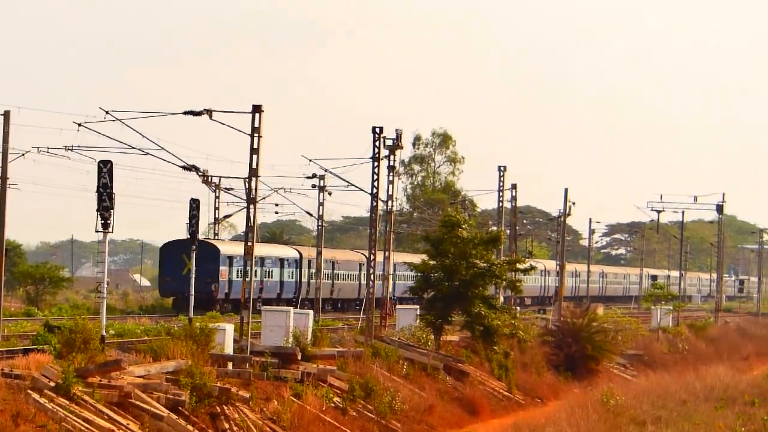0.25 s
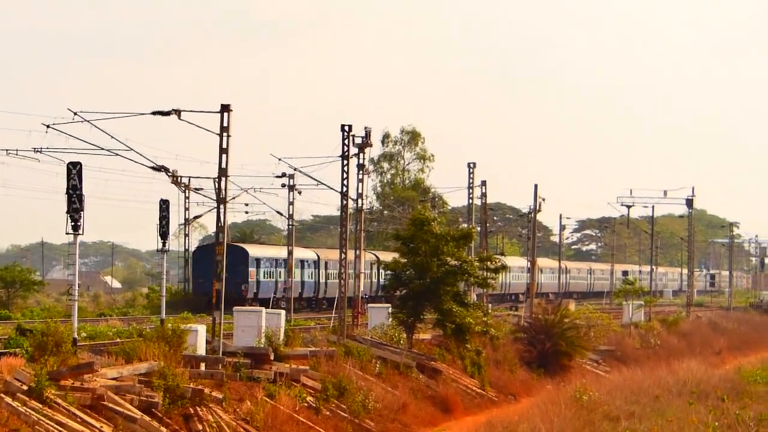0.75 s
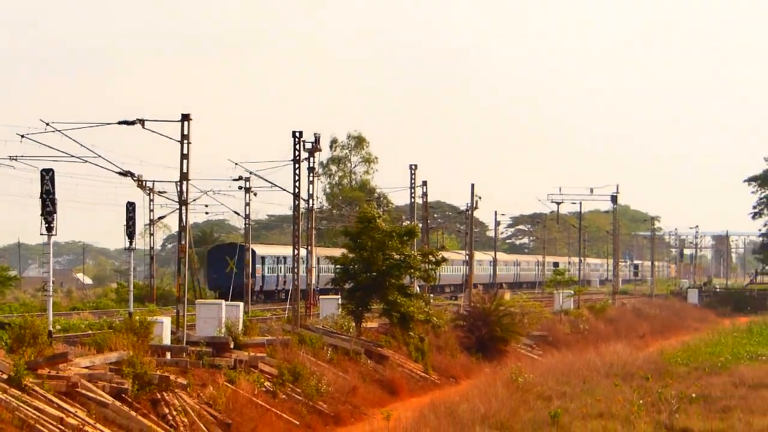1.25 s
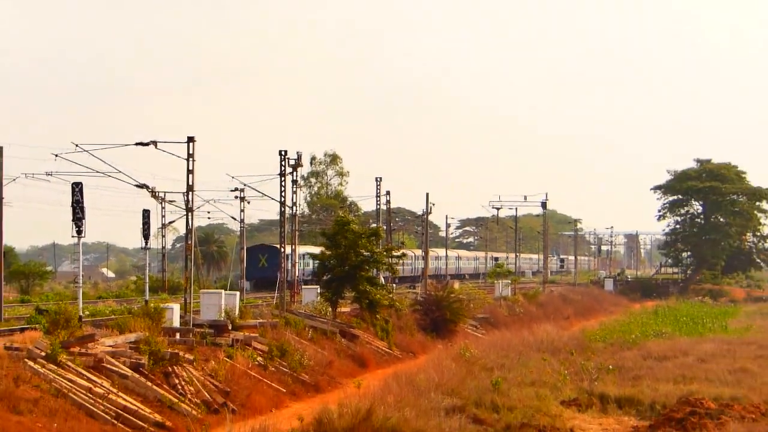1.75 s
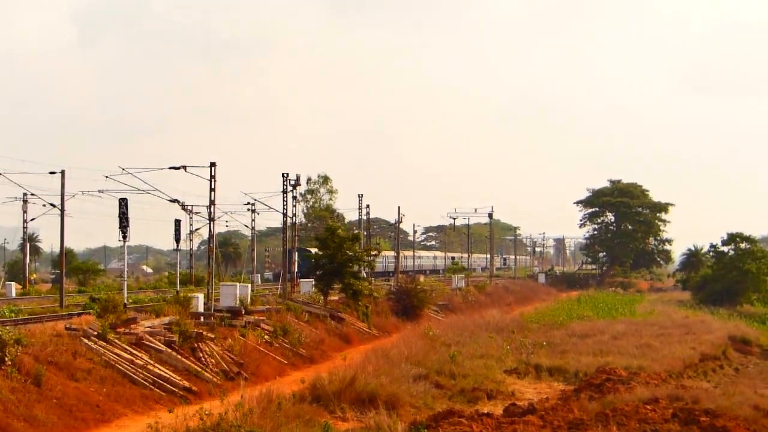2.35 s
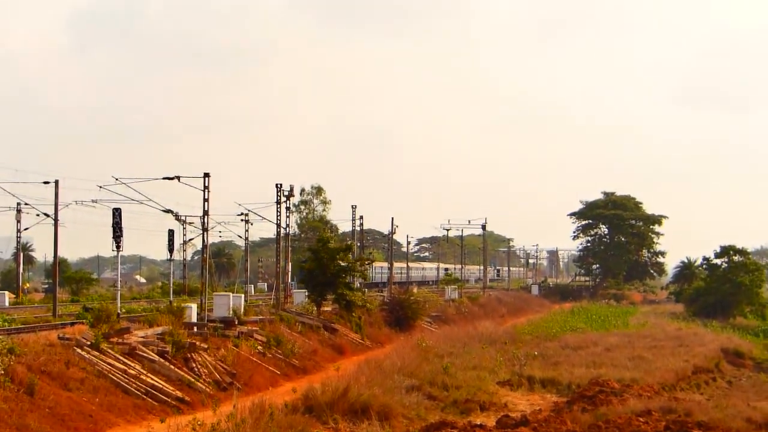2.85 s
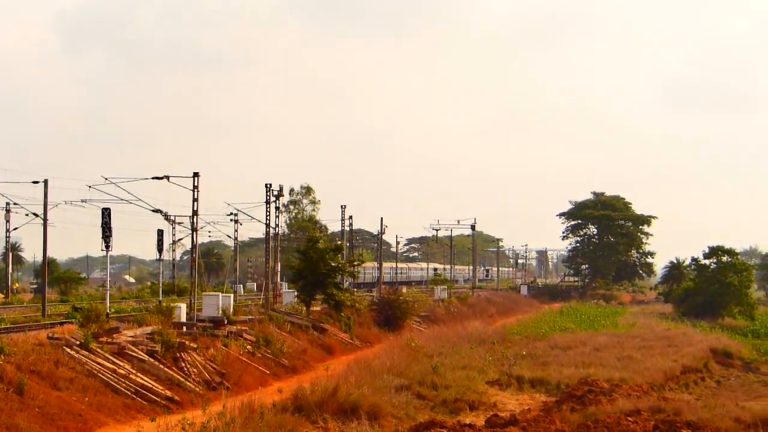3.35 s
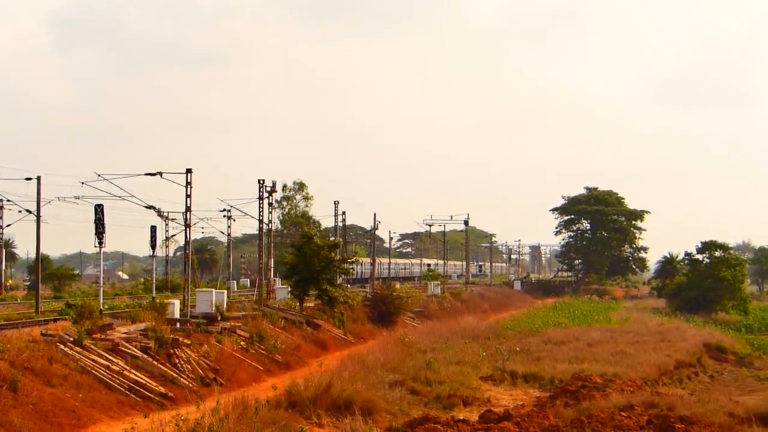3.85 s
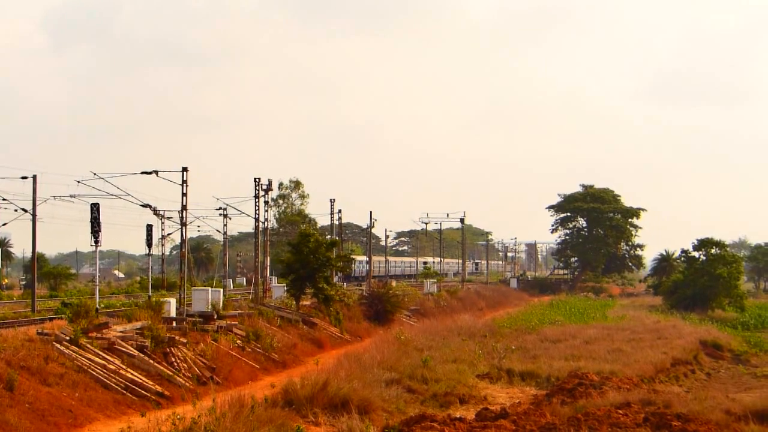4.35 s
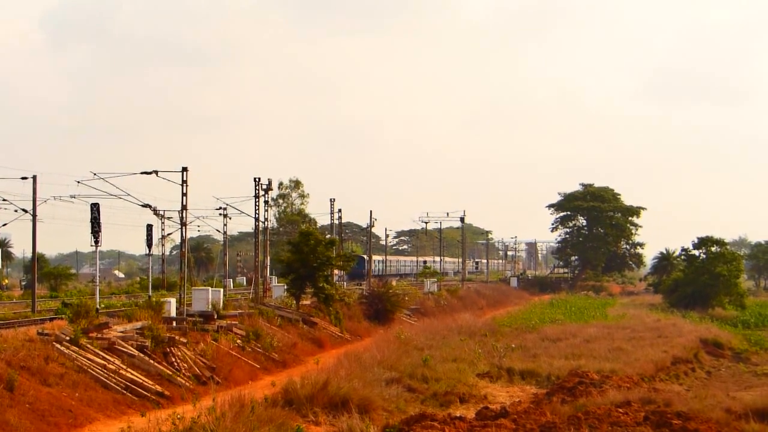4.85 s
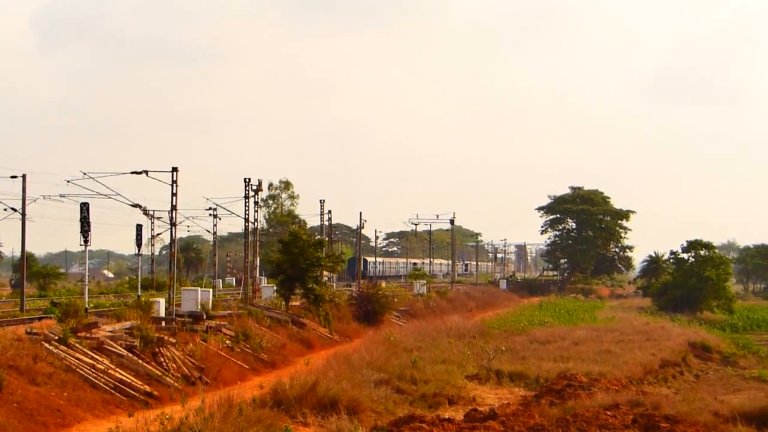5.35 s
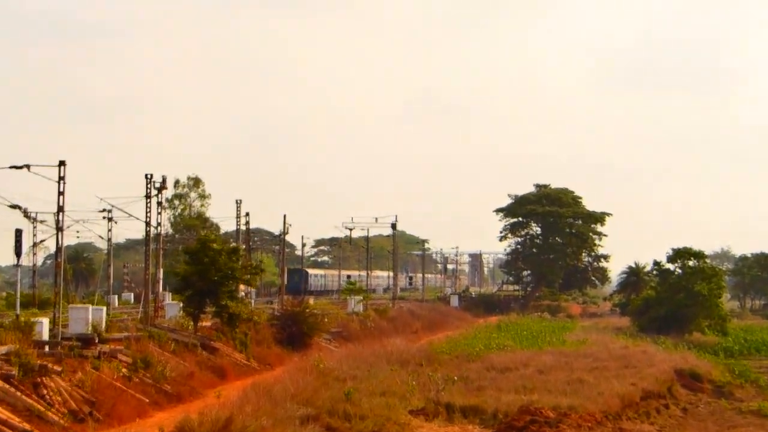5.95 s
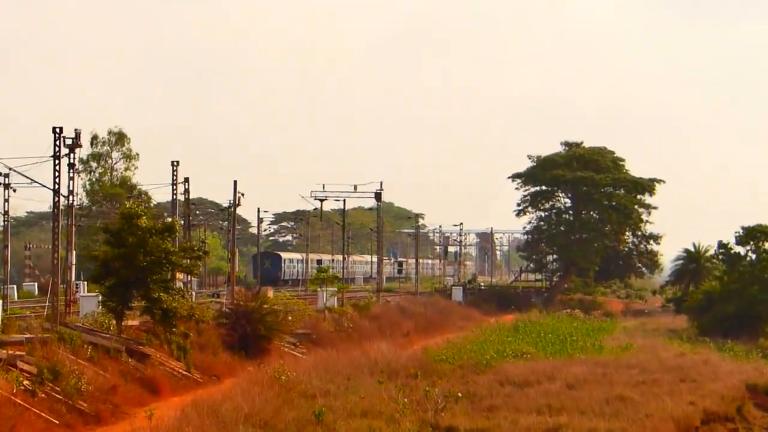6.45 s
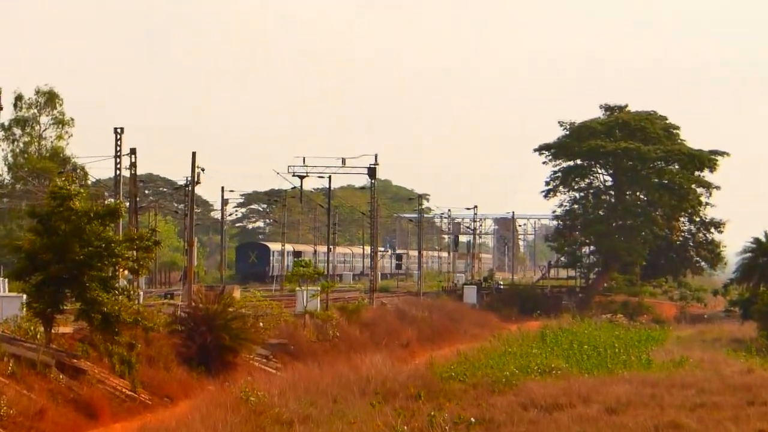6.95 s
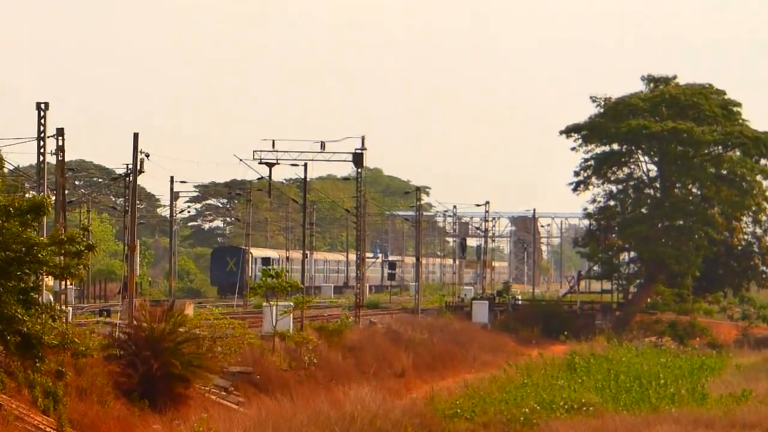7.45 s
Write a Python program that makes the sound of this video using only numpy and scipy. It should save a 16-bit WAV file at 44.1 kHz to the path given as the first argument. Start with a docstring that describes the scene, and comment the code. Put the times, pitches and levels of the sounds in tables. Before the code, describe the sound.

A train rolls away across open fields, its roar and rail hiss fading while a small engine putters rapidly and a bird chatters.

```python
"""Open fields: a train rolls away, its wheel roar and rail hiss fading as shaped noise over thin air.
A low hum of three wavering sines fades with it; a bird calls in falling stacks of harmonics, some trilled.
A small engine ticks over about 21 times a second: a pop of decaying rings and two noise ticks a turn.
Metal clinks ring briefly; a close pair of microphone ports turns the bass out of phase."""
import sys
import numpy as np
from scipy import signal
from scipy.fft import rfft, irfft, next_fast_len
from scipy.io import wavfile
from scipy.ndimage import uniform_filter1d

SR = 44100
rng = np.random.default_rng(int(sys.argv[2]) if len(sys.argv) > 2 else 0)


def file_out(sig):
    """Save sig as 16-bit WAV at sys.argv[1]."""
    # one column per channel
    cols = np.atleast_2d(sig).T
    # limit, then scale
    lim = np.clip(cols, -1, 1)
    pcm = np.round(lim * 32767).astype(np.int16)
    wavfile.write(sys.argv[1], SR, pcm)


N = 340011
FRAME, HOP = 512, 128  # short-time spectra, samples
BINS, FRAMES = FRAME // 2 + 1, N // HOP + 5

# Open air, steady: f/Hz, density/dB per Hz
AIR_SPECTRUM = [(60, -9), (170, -4), (300, -4), (3000, -30), (8000, -10), (11000, 0), (13000, -4),
                (15800, -14)]
AIR_LEVEL_DB = -69
# Train layers: t/s, roar level/dB, rush level/dB, hiss level/dB, sizzle level/dB
TRAIN_LEVELS_DB = [(0, -39.8, -47.7, -44.6, -44.6), (.35, -40.5, -47, -42.4, -43.2),
                   (.72, -41, -42.5, -41.5, -42), (.95, -41.7, -48.5, -43, -46),
                   (1.25, -41.6, -50, -45, -49), (1.45, -42, -51, -46.5, -49),
                   (1.55, -42, -48, -45.5, -46.5), (1.75, -42.5, -52, -47.3, -48.5),
                   (2.1, -43.3, -54.5, -47.7, -48.3), (2.3, -44.5, -57.3, -49.3, -50.7),
                   (2.65, -44.4, -56.5, -48.7, -51.5), (2.9, -44.3, -53.5, -48.5, -52),
                   (3.2, -44.7, -52.5, -49.5, -51.3), (3.4, -45, -50.5, -49, -50.5),
                   (3.65, -45.3, -50.5, -49, -50.3), (3.85, -46.5, -51.5, -49.5, -50.8),
                   (4.1, -48, -53, -49, -48.6), (4.3, -48.7, -52.5, -53.2, -51),
                   (4.85, -49.8, -53.6, -52.7, -52.7), (5.4, -50.8, -52.5, -53.3, -49.3),
                   (5.72, -52.8, -61.2, -57.5, -54.3), (5.95, -53.5, -62.5, -57, -53.5),
                   (6.2, -53.5, -62.5, -57.5, -50.5), (6.4, -53.5, -63, -58.3, -50.3),
                   (6.5, -54, -63.6, -58, -52.5), (6.7, -54, -63.4, -58.3, -53),
                   (6.83, -53.4, -62, -57.2, -50.3), (7.05, -53.4, -62.2, -57.4, -50.6),
                   (7.4, -54.7, -66, -61.5, -56.2), (7.7, -57.2, -67.4, -63.7, -57)]
# Rolling roar: f/Hz, density/dB per Hz
ROAR_SPECTRUM = [(40, -40), (120, -66), (220, -33), (300, -16), (450, -6.5), (600, -.5), (700, .5),
                 (800, .5), (1000, -6), (1250, -6), (1600, -9), (2000, -10), (2400, -26), (3500, -70)]
# Wheel rush: f/Hz, density/dB per Hz
RUSH_SPECTRUM = [(700, -70), (1300, -6), (1600, -2), (2000, -1), (2400, -1.5), (2800, -1), (3100, -6),
                 (3500, -10), (5500, -70)]
# Rail hiss: f/Hz, density/dB per Hz
HISS_SPECTRUM = [(2500, -70), (3100, -18), (3350, -7), (3600, -4), (3900, -2), (4100, 1.5), (4350, -5),
                 (5200, -12), (9000, -70)]
# High sizzle: f/Hz, density/dB per Hz
SIZZLE_SPECTRUM = [(2800, -70), (4000, -12), (4550, -6), (4750, -4), (4980, -5), (5600, -5.7), (7000, -6.5),
                   (7700, -8.5), (8200, -14), (9500, -11.7), (11000, -18.7), (13000, -26), (15800, -39)]
# Narrow singing band of the rails: f/Hz, density/dB per Hz
SINGING_SPECTRUM = [(3800, -60), (4400, -7), (4750, 0), (5050, -6), (5800, -60)]
# Singing band: t/s, level/dB
SINGING_LEVELS_DB = [(0, -53), (.6, -51.5), (1.2, -56), (2.3, -57), (3.1, -59), (3.4, -54), (3.8, -52),
                     (3.98, -52.5), (4.1, -56), (4.3, -56), (5.3, -56), (5.75, -61), (6.05, -62),
                     (6.25, -57), (6.6, -61), (6.9, -57), (7.2, -61), (7.7, -64)]
# Swells of brighter hiss late in the pass: f/Hz, density/dB per Hz
SWELL_SPECTRUM = [(3600, -60), (4300, -9), (5400, -4), (6300, 0), (7300, -2), (8000, -12), (11000, -40)]
# Swells: t/s, level/dB
SWELL_LEVELS_DB = [(0, -70), (3.9, -68), (4.15, -60), (4.5, -66), (5.9, -66), (6.1, -61), (6.3, -57),
                   (6.45, -65), (6.75, -65), (6.95, -58), (7.25, -62), (7.7, -72)]
# Engine drone: f/Hz, density/dB per Hz
DRONE_SPECTRUM = [(250, -60), (500, -22), (800, 1), (1000, -7), (1250, 1), (1500, -9), (2000, -4),
                  (2400, -22), (3500, -70)]
# Engine drone: t/s, level/dB
DRONE_LEVELS_DB = [(0, -46.5), (1.5, -50), (2.5, -54), (3.5, -50.5), (4.5, -51.5), (5.5, -53), (6.5, -53.5),
                   (7.8, -57)]

# Hum harmonics before waver and fade: f/Hz, rms level/dB
HUM_TONES = [(280, -60), (560, -54), (840, -48.5)]
# Hum fade: t/s, gain/dB
HUM_FADE_DB = [(0, 0), (1.3, -2), (2.4, -8), (2.7, -14), (4, -20), (7.8, -30)]

# Bird notes: start t/s, length/s, starting fundamental f/Hz, fall/Hz, bend of fall (1 = straight),
# 3rd harmonic peak level/dB, loudest at (share of note 0-1), 2nd re 3rd/dB, 4th re 3rd/dB,
# step to each higher harmonic/dB, trill rate/Hz (0 = none)
BIRD_NOTES = [(.455, .09, 1378, -10, 1, -50.3, .7, 7, -9, -9, 0),
              (.612, .078, 1390, 5, 1, -51, .7, 7, -9, -9, 65),
              (.693, .09, 1350, 190, 1.3, -51.5, .1, 7, -6, -1, 70),
              (1.516, .04, 1445, 215, 2, -36.5, .05, -4, -1, -7, 0),
              (1.572, .023, 1350, 10, 1, -43, .4, -25, -9, -9, 0),
              (1.755, .033, 1415, 110, 2.6, -35.5, .6, -17, -3, -5, 0),
              (1.79, .05, 1350, -5, 1, -50, .5, -23, -9, -6, 67),
              (1.846, .078, 1368, -15, 1, -42.5, .6, -23, -6, -4, 67),
              (1.993, .069, 1400, 40, 1, -41, .7, -22, -3, -5, 73),
              (2.065, .082, 1335, 240, 1.3, -45.5, .25, -14, 0, -1.5, 0),
              (2.135, .05, 1350, 40, 1, -48, .3, -15, -9, -9, 60),
              (2.19, .018, 1640, -70, .6, -36.5, .7, -14, -12, -10, 0),
              (2.208, .012, 1710, 90, 1.5, -38, .1, -14, -16, -10, 0),
              (3.323, .027, 1390, 50, 1.5, -39, .2, -9, -2, -10, 0),
              (3.385, .025, 1390, 60, 1, -45, .5, -15, -10, -8, 0),
              (3.45, .29, 1370, 40, 1, -49.5, .5, -9, -8, -8, 70),
              (3.74, .12, 1330, 170, 1.4, -53, .2, -3, -9, -9, 70)]
# Fixed valleys of the bird's throat: f/Hz, gain/dB
THROAT_DB = [(4300, 0), (4900, -5), (5350, -7), (5600, 0), (7800, 0), (8600, -3), (9200, -4), (10000, 1)]
# Faint rising whistle: start t/s, length/s, from f/Hz, to f/Hz, peak level/dB
WHISTLE_SLIDE = (2.168, .052, 1500, 1720, -45)
HARMONICS = 7  # 2nd to 8th
START_DB, END_DB = -4, -6  # note ends re peak
FLUTTER_DB, FLUTTER_S = 2.2, .005  # rms and smoothing, own to each harmonic
DULLING_DB = -2.2  # added to each upward step by the end of a note
TRILL_DEPTH = .97

# Clinks: t/s, level/dB, f/Hz
CLINK_TAPS = [(0.1376, -33, 4050), (0.6034, -35, 4400), (0.6863, -33, 4920), (0.748, -33, 4800),
              (0.8295, -32, 6320), (0.9991, -33, 4650), (1.4726, -37, 4140)]

# Engine speed: t/s, turn rate/Hz
TURN_RATES_HZ = [(0, 22.52), (.57, 20.97), (1.34, 20.31), (2.03, 20.49), (2.32, 18.99), (3.52, 20.52),
                 (4.49, 21.07), (4.98, 20.32), (5.36, 21.57), (5.88, 20.86), (6.59, 22.49), (7.16, 20.67),
                 (7.72, 22.53)]
# Engine, nominal: t/s, pop level/dB, first tick level/dB, second tick level/dB
ENGINE_LEVELS_DB = [(0, -46, -56, -52), (.3, -45, -49, -45), (.9, -45, -49, -45), (1.2, -45, -58, -56),
                    (2.4, -44, -58, -56), (3.3, -41, -55, -55), (3.75, -35, -53, -55),
                    (4.05, -35.5, -51, -55), (4.25, -37.5, -52, -54), (4.45, -35, -53, -54),
                    (4.9, -35, -55, -53), (5.1, -37.5, -58, -54), (5.5, -46, -60, -55),
                    (6.5, -49, -61, -56), (7.4, -44, -62, -58), (7.8, -50, -65, -62)]
# Rings of a pop: f/Hz, delay re turn/s, level re pop/dB, t60/s
POP_RINGS = [(1275, -.002, 1, .055), (1110, -.003, 1, .035), (2000, -.002, -12, .03), (830, .003, -5, .07),
             (460, .008, -12, .04)]
# Extra gain of the second ring as engine load changes: t/s, gain/dB
SWEEP_GAINS_DB = [(0, -3), (3.5, -8), (4.0, -7), (4.2, 0), (4.8, 1), (5.1, 0), (5.5, -3), (7.8, -6)]
# Ticks: nominal delay after the turn/s
TICK_DELAYS_S = (.0095, .0205)
# Tick noise: f/Hz, density/dB per Hz
TICK_SPECTRUM = [(3000, -30), (4300, -1), (5200, -4), (6500, -1), (7500, 0), (9500, -1), (12000, -10),
                 (15000, -26)]
# Tick bands: f/Hz, width/octaves
TICK_BANDS = [(4300, .15), (5800, .25), (7200, .2), (9500, .2), (12000, .2)]
START_TURNS = 1.38  # made before 0 s
FIRST_TURN, LAST_TURN = 3, 161  # last excluded
PUFF, RING, ECHO = 900, 1800, 5000  # lengths, samples

# Likeness of the ports' noise: f/Hz, correlation 0-1
PORT_LIKENESS = [(100, .9), (200, .99), (800, .997), (1500, .96), (2500, .9), (4000, .93), (6000, .84),
                 (10000, .84), (14000, .66)]
# Right port lead: f/Hz, phase/rad
RIGHT_LEAD_RAD = [(100, 3.12), (400, 2.94), (800, 2.79), (1500, 2.52), (2500, 2.12), (4000, 1.6),
                  (6000, 1.07), (8000, .86), (10000, .66), (12000, .44), (14500, 0)]
# Left re right port: f/Hz, level/dB
PORT_TILT_DB = [(60, 0.5), (180, 1.5), (550, 0.0), (1650, 0.0), (4970, 1.0), (15000, 2.0)]
EDGE_HZ = 15740


def gain_of(db):
    """Decibels to amplitude gain."""
    return 10 ** (np.asarray(db) / 20)


def evened(x):
    """Scales to rms 1."""
    return x / np.sqrt(np.mean(abs(x) ** 2) + 1e-20)


def read(points, hz):
    """Interpolates a spectrum table over log frequency."""
    f_hz, value = np.transpose(points)
    return np.interp(np.log(hz + 1), np.log(f_hz + 1), value)


def at_time(points, t_s):
    """Interpolates a two-column time table linearly."""
    return np.interp(t_s, *np.transpose(points))


def add(mix, start_s, sound):
    """Mixes a sound in at a time, cut at the end."""
    part = mix[..., round(start_s * SR):][..., :sound.shape[-1]]
    part += sound[..., :part.shape[-1]]


def noise_pair(shape):
    """Noise at two ports: random short-time spectra sharing a part set by frequency."""
    hz = np.fft.rfftfreq(FRAME, 1 / SR)
    a, b, c, d = rng.standard_normal(size=(FRAMES, BINS, 4)).T
    likeness = np.clip(read(PORT_LIKENESS, hz), 0, 1)[:, None]
    left = a + 1j * b
    right = likeness * left + np.sqrt(1 - likeness ** 2) * (c + 1j * d)
    spectra = shape * np.array([left, right])
    return signal.istft(spectra, nperseg=FRAME, noverlap=FRAME - HOP)[1][:, :N]


def wash(patchy_db=.9, flicker_db=1.6, streak_db=1.3):
    """Air, train and engine drone: noise bands with drifting patches, thin streaks, shared treble flicker."""
    hz = np.fft.rfftfreq(FRAME, 1 / SR)
    t_s = np.arange(FRAMES) * HOP / SR
    train_s, *train_db = np.transpose(TRAIN_LEVELS_DB)
    roar_db, rush_db, hiss_db, sizzle_db = (np.interp(t_s, train_s, db) for db in train_db)
    layers = [
        (AIR_SPECTRUM, np.full(FRAMES, AIR_LEVEL_DB)),
        (ROAR_SPECTRUM, roar_db),
        (RUSH_SPECTRUM, rush_db),
        (HISS_SPECTRUM, hiss_db),
        (SIZZLE_SPECTRUM, sizzle_db),
        (SINGING_SPECTRUM, at_time(SINGING_LEVELS_DB, t_s)),
        (SWELL_SPECTRUM, at_time(SWELL_LEVELS_DB, t_s)),
        (DRONE_SPECTRUM, at_time(DRONE_LEVELS_DB, t_s)),
    ]
    power = sum(np.outer(evened(gain_of(read(spectrum, hz))), gain_of(db)) ** 2
                for spectrum, db in layers)
    patches = uniform_filter1d(rng.standard_normal((FRAMES, BINS)), size=14, axis=0)
    patches = evened(uniform_filter1d(patches, size=6)).T  # smooth over frequency too
    streaks = evened(uniform_filter1d(rng.standard_normal((FRAMES, BINS)), size=40, axis=0)).T
    flicker = evened(uniform_filter1d(rng.standard_normal(FRAMES), size=2))
    treble_flicker = np.outer(hz / (hz + 2000), flicker)
    uneven_db = patchy_db * patches + streak_db * streaks + flicker_db * treble_flicker
    field = np.sqrt(power) * gain_of(uneven_db)
    return np.sqrt(power.mean()) * evened(noise_pair(field))


def hum():
    """Three harmonics with one shared phase drift and separate level drifts, fading with the train."""
    t_s = np.arange(N) / SR
    drift, *level_drifts = [evened(uniform_filter1d(rng.standard_normal(N), size=7000))
                            for _ in range(len(HUM_TONES) + 1)]
    tones = np.zeros(N)
    for k, (hz, rms_db) in enumerate(HUM_TONES, 1):
        phase = 2 * np.pi * hz * t_s + .6 * k * drift
        tones += gain_of(rms_db + 2.6 * level_drifts[k - 1]) * np.sin(phase)
    return np.sqrt(2) * tones * gain_of(at_time(HUM_FADE_DB, t_s))


def whistle(start_s, length_s, from_hz, to_hz, peak_db):
    """One soft sine that slides up."""
    share = np.arange(0, length_s, 1 / SR) / length_s
    angle = 2 * np.pi * np.cumsum(from_hz + (to_hz - from_hz) * share) / SR
    return start_s, gain_of(peak_db) * np.sin(np.pi * share ** 1.5) * np.sin(angle)


def note(start_s, length_s, top_hz, fall_hz, bend, peak_db, loudest,
         second_db, fourth_db, step_db, trill_hz):
    """Gliding harmonics without a fundamental, filtered by the throat; a fast trill may chop them."""
    t_s = np.arange(0, length_s, 1 / SR)
    share = t_s / length_s
    hz = top_hz - fall_hz * share ** bend
    angle = 2 * np.pi * np.cumsum(hz) / SR
    swell_db = peak_db + np.interp(share, (0, np.clip(loudest, 0, 1), 1), (START_DB, 0, END_DB))

    dulling_db = DULLING_DB * share
    steps_up = np.arange(HARMONICS - 2)[:, None]
    above_db = fourth_db + dulling_db + steps_up * (step_db + dulling_db)
    flat_db = np.zeros(len(t_s))
    harmonic_db = np.vstack([second_db + flat_db, flat_db, above_db])  # re 3rd

    span = round(FLUTTER_S * SR)
    flutter = np.sqrt(span) * uniform_filter1d(rng.standard_normal((HARMONICS, RING)), size=span)
    flutter_db = FLUTTER_DB * np.take(flutter, np.arange(len(t_s)), axis=1, mode="wrap")

    order = np.arange(HARMONICS)[:, None] + 2
    level_db = swell_db + harmonic_db + flutter_db + read(THROAT_DB, order * hz)
    stack = (gain_of(level_db) * np.sin(order * (angle + 1))).sum(0)
    trill = 1 - TRILL_DEPTH * (trill_hz > 1) * np.cos(2 * np.pi * trill_hz * t_s)
    return start_s, stack * trill * signal.windows.tukey(len(t_s), min(1, .004 / length_s))


def bird():
    """Notes and whistle, plus a faint scattered echo from the field: convolution with decaying noise."""
    calls = np.zeros(N)
    for row in BIRD_NOTES:
        add(calls, *note(*row))
    add(calls, *whistle(*WHISTLE_SLIDE))
    t_s = np.arange(ECHO) / SR
    echo = rng.standard_normal((2, ECHO)) * gain_of(-60 * t_s / .2)
    echo /= np.linalg.norm(echo[0])
    return calls + gain_of(-17) * signal.fftconvolve(calls[None], echo, axes=1)[:, :N]


def ticking():
    """Bands of bright noise from which ticks are cut."""
    hz = np.fft.rfftfreq(FRAME, 1 / SR) + 1
    bands = []
    for f_hz, width_oct in TICK_BANDS:
        band_db = read(TICK_SPECTRUM, hz) - 3 * (np.log2(hz / f_hz) / width_oct) ** 2
        bands.append(noise_pair(gain_of(band_db)[:, None]))
    return evened(np.array(bands)) / 2


def tick(noise, cut_s, t60_s=.032, uneven_db=3.2):
    """A puff of noise: quick rise, fast decay, bands mixed anew each time."""
    t_s = np.arange(PUFF) / SR
    band_gain = gain_of(uneven_db * rng.standard_normal(len(noise)) - uneven_db / 2)[:, None, None]
    puff = (band_gain * noise[..., round(cut_s * SR):][..., :PUFF]).sum(0)
    return puff * gain_of(-60 * t_s / t60_s) * np.minimum(t_s / .003, 1) ** 2


def clinks():
    """Brighter taps of metal: a noise puff and a short decaying sine."""
    out, noise = np.zeros((2, N)), ticking()
    t_s = np.arange(PUFF) / SR
    for start_s, db, hz in CLINK_TAPS:
        ring = np.sin(2 * np.pi * hz * t_s) * gain_of(-60 * t_s / .04)
        add(out, start_s, gain_of(db) * (.3 * tick(noise, start_s) + .5 * ring))
    return out


def engine():
    """Each turn: a pop of damped rings and two noise ticks, uneven in level; rings vary in pitch, ticks in time."""
    out, noise = np.zeros((2, N)), ticking()
    t_s = np.arange(N) / SR
    turns = START_TURNS + np.cumsum(at_time(TURN_RATES_HZ, t_s)) / SR
    turn_times_s = np.interp(np.arange(FIRST_TURN, LAST_TURN), turns, t_s)
    level_s, *levels_db = np.transpose(ENGINE_LEVELS_DB)

    hz, lag_s, ring_db, t60_s = np.transpose(POP_RINGS)[..., None]
    first_lag_s = lag_s.min()
    age_s = np.maximum(np.arange(RING) / SR + first_lag_s - lag_s, 0)  # since each ring began
    envelope = (1 - np.exp(-age_s / .0012)) * gain_of(ring_db - 60 * age_s / t60_s)
    is_sweep = np.arange(len(POP_RINGS))[:, None] == 1

    for turn_s in turn_times_s:
        pop_db, *ticks_db = (np.interp(turn_s, level_s, db) for db in levels_db)
        size, detune, phase = rng.standard_normal(size=(len(POP_RINGS), 3)).T[..., None]
        level_db = pop_db + 2.0 * size + is_sweep * at_time(SWEEP_GAINS_DB, turn_s)
        angle = 2 * np.pi * hz * (1 + .022 * detune) * age_s + .3 * phase
        rings = gain_of(level_db) * envelope * np.sin(angle)
        add(out, turn_s + first_lag_s, rings.sum(0))
        for tick_db, delay_s in zip(ticks_db, TICK_DELAYS_S):
            size, late = rng.standard_normal(2)
            start_s = turn_s + delay_s - .0015 + .0008 * late  # early by 1.5 ms on average
            puff = tick(noise, turn_s - .02 + delay_s)
            add(out, start_s, gain_of(tick_db + 6 + 1.3 * size) * puff)
    return out


def scene():
    """Wash, hum, bird, clinks and engine."""
    return wash() + hum() + bird() + clinks() + engine()


def record(dry):
    """Ports differ in phase and level by frequency; a wind filter cuts the bass; then the band limit."""
    size = next_fast_len(N + 4096)
    hz = np.fft.rfftfreq(size, 1 / SR)
    tilt = gain_of(read(PORT_TILT_DB, hz) / 2)  # half to each port
    ports = np.array([tilt, np.exp(1j * read(RIGHT_LEAD_RAD, hz)) / tilt])
    low_cut = 1 / np.sqrt(1 + (170 / (hz + 1)) ** 8)
    band = np.clip((EDGE_HZ - hz) / 60, 1e-4, 1)
    return irfft(rfft(dry, size) * ports * low_cut * band, size)[:, :N]


dry = scene()
out = record(dry)
file_out(out)
```